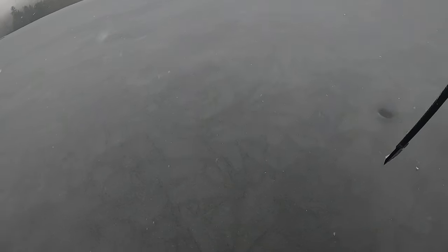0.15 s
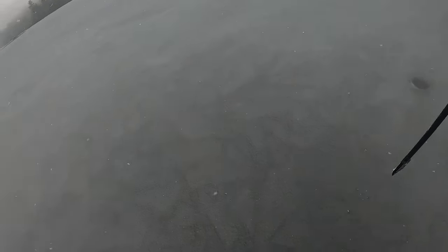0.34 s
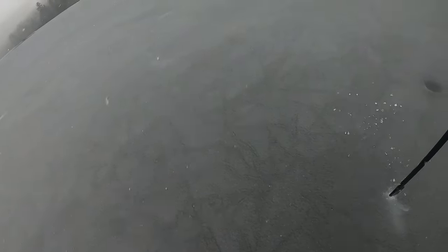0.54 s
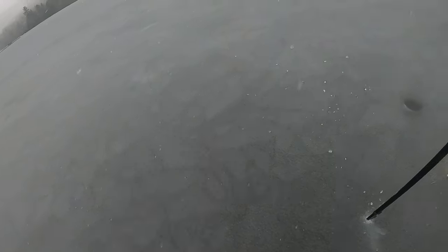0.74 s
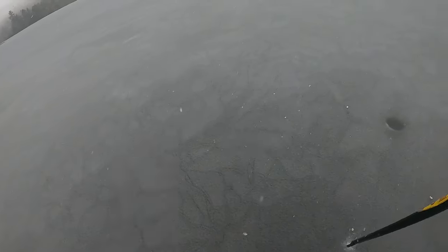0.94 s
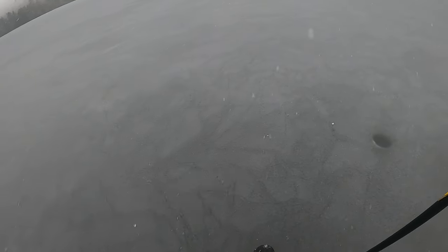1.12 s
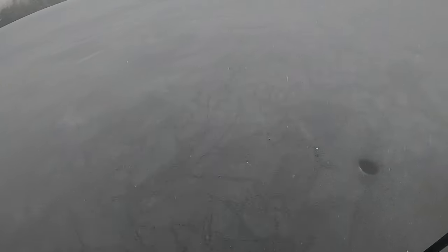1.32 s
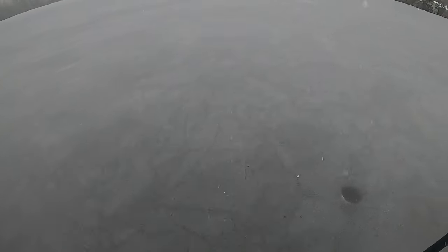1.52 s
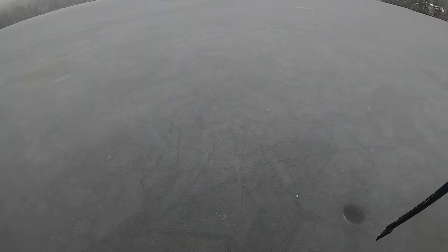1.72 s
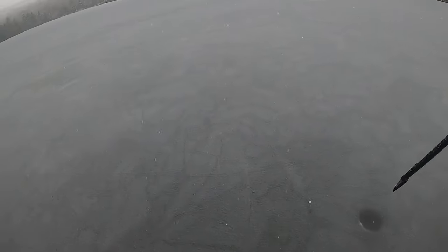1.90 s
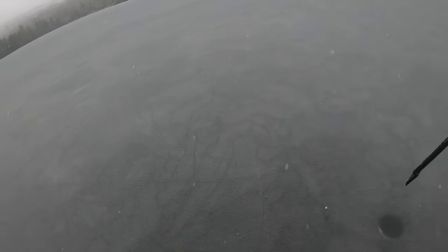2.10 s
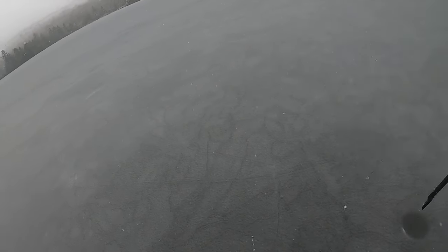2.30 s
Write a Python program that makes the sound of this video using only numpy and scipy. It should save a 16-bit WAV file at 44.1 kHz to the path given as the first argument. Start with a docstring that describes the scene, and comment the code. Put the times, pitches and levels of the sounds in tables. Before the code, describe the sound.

A steel chisel strikes lake ice once with a sharp crack, then spiked boots crunch and click

```python
"""A steel chisel is driven once into lake ice by someone walking in spiked boots, close to a worn camera.
The blow is dense crackle plus scattering splinters, a falling thump swept through the sheet, and a ring.
Spikes bite as short pings with noise ticks, boots knock as lower pings, and footfalls crunch as fine
crackle. Clothes and soles rustle as three bands of noise; low noise, mostly different at the two
microphone ports, makes the wind gusts and a few deep footstep thumps."""
import sys
import numpy as np
from scipy import signal
from scipy.fft import rfft, irfft
from scipy.io import wavfile
from scipy.ndimage import uniform_filter1d

SR = 44100
rng = np.random.default_rng(int(sys.argv[2]) if len(sys.argv) > 2 else 0)


def dump(signal):
    """Clip the signal to [-1, 1] and save it as 16-bit WAV at the path in sys.argv[1]."""
    limited = np.clip(np.atleast_2d(signal).T, -1, 1)
    pcm = np.round(limited * 32767).astype(np.int16)
    wavfile.write(sys.argv[1], SR, pcm)


N = 103635  # samples

# Chisel blow: the crack holds, then fades
BLOW_S, CRACK_S, CRACK_FADE_S, CRACK_DB, CRACKS_PER_S = 0.5203, 0.0073, 0.0041, -23, 22000
IMPACT_DB, IMPACT_S = 6.5, 0.0028  # extra strength as the edge first lands
SPLIT_LAG_S, SPLIT_DB, SPLIT_S = 0.0079, 4, 0.0011  # the ice gives way a moment later
CRACK_LAG_S = 0.001405  # delay at 1 kHz; the low part trails the treble
CHIP_T60_S, CHIP_DB = 0.16, -38.5  # splinters scatter after the blow
SHEET_DB, SHEET_LAG_S, SHEET_SLOPE = -11, 0.0089, 0.271  # peak; delay at 1 kHz; lows come later
RING_DB, RING_LAG_S, RING_RISE_S = -25.5, 0.01303, 0.0023
# Colour of splitting ice: freq_hz, level_db
CRACK_COLOUR = [(300, -34), (600, -18), (900, -4.5), (1600, -2.5), (2050, -9.5), (2600, -5), (3300, -5),
                (4400, -8.5), (5300, -12.5), (8000, -13), (11500, -29), (15500, -39)]
# Colour of the bending wave in the ice sheet: freq_hz, level_db
SHEET_COLOUR = [(15, -20), (30, 1), (90, -2), (300, -9), (600, -19.5), (1100, -16), (1600, -63),
                (3000, -90)]
# Brief ringing modes of the sheet: pitch_hz, level_db, t60_s
RING_MODES = [(174, 5.5, 0.11), (282, 1.5, 0.081), (410, 1.5, 0.098), (557, -4.5, 0.075), (724, -1, 0.029),
              (816, -1, 0.088), (1090, -4, 0.056)]

# Spike points biting the ice: peak_s, level_db, pitch_hz, length_cycles, tick_level_db
SPIKE_BITES = [(0.1406, -29, 2600, 1.1, -51), (0.2085, -27, 1530, 2.9, -27.5),
               (0.2131, -20.5, 1520, 1.6, -40), (0.2153, -21.5, 4100, 3.5, -28),
               (0.2188, -15.5, 1650, 1.8, -37), (0.2206, -18, 2660, 4, -26.5),
               (0.2219, -20, 1500, 3.6, -39), (0.2567, -40, 3770, 2, -54), (0.4263, -38, 1070, 1.5, -55),
               (0.7234, -33, 1760.0, 1.2, -58), (1.0553, -20.5, 2940, 2.2, -56),
               (1.0594, -30.0, 2020.0, 3.8, -55), (1.064, -31, 3120, 2, -52),
               (1.0657, -29.0, 2150, 4.3, -49.0), (1.069, -25, 2310, 4.8, -52),
               (1.0739, -23, 1630, 5.9, -48), (1.076, -20, 2010, 9.4, -53), (1.0793, -17, 1970, 2.1, -48),
               (1.0846, -20, 2200, 1.3, -42), (1.087, -18, 1300, 1.3, -42), (1.0891, -16.5, 3020, 3.9, -38),
               (1.0914, -18, 2860, 5.6, -26), (1.095, -27, 3500, 3.9, -55), (1.1006, -31, 3900, 4, -49),
               (1.104, -35, 3600, 2.2, -50), (1.2786, -22, 1430, 0.5, -34), (1.3045, -29, 3520, 3.2, -36),
               (1.355, -29, 1700.0, 2.8, -46), (1.3603, -18.5, 1920, 1.8, -50),
               (1.3643, -9.5, 2050, 1.7, -25.5), (1.365, -22.5, 2860, 3.4, -46),
               (1.3682, -19.5, 2850, 3.5, -49), (1.3697, -22, 1390, 6.4, -51), (1.378, -31, 2200, 3.4, -50),
               (1.3833, -31, 1990, 2.5, -55), (1.4047, -32, 1690, 1.6, -61), (1.442, -42, 8950, 3.7, -63),
               (1.785, -27, 4300, 8.6, -32), (1.796, -28, 1630, 2.5, -30), (1.8032, -30, 2940.0, 4, -50.0),
               (1.8084, -31, 3050, 3.8, -44), (1.8236, -27.5, 2590.0, 3.6, -48.0),
               (1.837, -24, 2490.0, 1.1, -43), (1.847, -27, 2580, 6.3, -51), (1.853, -38, 2620, 6.3, -52.0),
               (1.8627, -19, 2700, 1.3, -25), (1.8647, -23, 1300, 1.6, -39), (1.8693, -27.5, 1140, 2, -51),
               (1.872, -28, 1760, 2.8, -48), (1.874, -33, 2580, 6, -53), (1.889, -28, 3500, 6, -50),
               (1.902, -26, 5300, 6.6, -31), (1.9084, -31, 1440.0, 1.5, -30),
               (1.917, -33.5, 1320.0, 6, -51.0), (2.0524, -33, 4920, 6.2, -48),
               (2.057, -24.5, 1570, 5.2, -28), (2.0614, -19.5, 2900, 2, -21), (2.063, -16, 1694, 2.56, -21),
               (2.0655, -23.5, 7700, 10, -21), (2.069, -40, 2880, 3, -51), (2.0743, -33, 3620, 8, -50.0),
               (2.118, -39, 2750, 2, -58), (2.29, -50, 4840, 2.7, -56), (2.301, -49, 3260, 2.6, -48),
               (2.321, -48, 3120, 3, -60)]
# Colour of the dry tick at each bite: freq_hz, level_db
TICK_COLOUR = [(1200, -34), (2500, -6), (3900, 2.5), (4900, -3), (5900, 3.5), (8500, -5.5), (12000, -33),
               (15500, -41)]
TICK_FADE_S = 0.0009
# Boot knocks carried by the ice: peak_s, level_db, pitch_hz, length_cycles
BOOT_KNOCKS = [(0.03, -41.5, 285, 3.1), (0.218, -37.5, 350, 2.4), (0.425, -32.5, 314, 1.74),
               (1.0908, -30.5, 244, 0.53), (1.0988, -26.5, 213, 1.2), (1.1119, -32, 222, 2.5),
               (1.1378, -41, 212, 7.3), (1.1466, -28, 230.0, 1), (1.1926, -35.5, 230, 1.6),
               (1.2307, -35.5, 180, 1.9), (1.2825, -21, 229, 0.86), (1.2913, -34.5, 216, 2),
               (1.3714, -32, 219, 1.23), (1.6186, -36, 336, 2), (1.65, -38, 543, 3.4),
               (1.6755, -39, 333, 2.3), (1.7081, -30.5, 343, 0.46), (1.8579, -23, 310, 1.2),
               (1.8743, -28, 213, 3.4), (1.9024, -28.5, 162, 2.3), (1.9108, -30, 177, 0.41),
               (1.9379, -31.5, 202, 0.74), (1.972, -36.5, 253, 2.4), (2.0664, -30, 254, 1.44)]
# Second partial of a bite or knock: lowest pitch ratio, range of ratios, level below the first
OVERTONE_RATIO, OVERTONE_SPREAD, OVERTONE_DB = 1.37725, 0.875, -9

# Crunch under the footfalls: start_s, length_s, level_db
FOOTFALLS = [(0.21, 0.0081, -36.5), (0.7196, 0.0045, -49), (1.061, 0.033, -44), (1.088, .014, -39.5),
             (1.353, 0.02, -42), (1.778, 0.09, -46.5), (1.854, 0.058, -43.5), (2.055, 0.01, -34),
             (2.07, 0.0086, -45.5), (2.192, 0.006, -68)]
# Colour of the crunch: freq_hz, level_db
CRUNCH_COLOUR = [(290, -22), (500, -6.5), (815, -10), (1650, -0.5), (2460, -4.5), (3060, -2.5), (4600, -7),
                 (5800, -13.5), (7030, -11), (7780, -16.5), (15500, -44)]
CRUNCH_PER_S, CRUNCH_T60_S, CRUNCH_RISE_S = 12000, 0.04, 0.00077

# Clothes and sliding soles: time_s, middle_db, low_db, treble_db
RUSTLE_LEVELS = [(0, -44, -40, -54), (0.04, -46.5, -48, -57.5), (0.08, -53.5, -50.5, -59),
                 (0.13, -48, -49, -55), (0.18, -49.5, -49.5, -57), (0.25, -49, -51.5, -57.5),
                 (0.33, -48, -49.5, -59), (0.39, -55, -53.5, -64.5), (0.46, -51, -46.5, -62.5),
                 (0.51, -46.5, -45.5, -50.5), (0.56, -61, -39, -63), (0.595, -50, -43, -59),
                 (0.63, -54, -54, -62.5), (0.69, -58, -50.5, -66), (0.76, -54, -54, -65),
                 (0.82, -50.5, -50, -58), (0.9, -49.5, -49.5, -61), (0.965, -48.5, -49, -58.5),
                 (1.035, -46, -50, -54.5), (1.08, -39.5, -53, -54), (1.13, -40.5, -42.5, -55.5),
                 (1.2, -44.5, -47.5, -56.5), (1.26, -42, -52, -50), (1.33, -41.5, -49, -48),
                 (1.36, -42.5, -54, -54), (1.39, -46.5, -50.5, -57.5), (1.43, -55.5, -55, -62.5),
                 (1.5, -51.5, -54.5, -61), (1.56, -50.5, -47, -57), (1.62, -46, -49, -56),
                 (1.7, -49, -49, -59.5), (1.75, -53.5, -55.5, -66), (1.79, -51, -49.5, -47.5),
                 (1.86, -41, -42, -56), (1.94, -48.5, -42, -53.5), (2.0, -53, -56.5, -59),
                 (2.04, -54, -49, -57.5), (2.1, -47.5, -50, -55.5), (2.15, -56.5, -60, -61.5),
                 (2.22, -56, -59, -61), (2.28, -62, -62.5, -70), (2.35, -56.5, -60, -65)]
# Colours of the three rustle bands: freq_hz, level_db
RUSTLE_MIDDLE = [(350, -7.5), (600, -4), (882, -14.5), (1030, -1), (1710, -1.5), (2220, -3), (4120, -6.5),
                 (6000, -23), (7800, -50), (13200, -120)]
RUSTLE_LOW = [(65, -63), (110, -30), (166, -1.5), (236, -4), (284, -3), (536, -13), (900, -19.5),
              (1170, -29), (1980, -120)]
RUSTLE_TREBLE = [(2650, -35), (4500, -3), (4860, -4.5), (5900, -7.5), (8220, -7), (9660, -18.5),
                 (12500, -19.5), (15600, -40)]
# Likeness of the rustle at the two ports: freq_hz, likeness (0 to 1)
RUSTLE_LIKENESS = [(60, 0.23), (150, 0.7), (380, 0.92), (950, 0.68), (2380, 0.8), (5980, 0.11),
                   (15000, 0.02)]

# Low noise at the ports: wind gusts, and deep footstep thumps near 1.11, 1.285, 1.87 and 2.07 s:
# time_s, left_db, right_db
LOW_NOISE_LEVELS = [(0, -42, -53), (0.04, -39, -38), (0.08, -56, -60), (0.13, -46, -62), (0.16, -37, -51),
                    (0.2, -36, -49), (0.23, -27.5, -36), (0.27, -40, -57), (0.3, -33, -40),
                    (0.335, -22.5, -39), (0.37, -34.5, -41), (0.4, -34, -42), (0.44, -34, -44),
                    (0.48, -27.5, -44), (0.51, -32, -56), (0.57, -37, -30.5), (0.605, -36, -24.5),
                    (0.65, -42, -32), (0.69, -24, -28.5), (0.73, -30.5, -38), (0.78, -46, -38),
                    (0.81, -38.5, -43), (0.84, -36.5, -48), (0.88, -55, -69), (0.92, -68, -67),
                    (1.0, -54, -64), (1.06, -67, -60), (1.11, -36, -36.5), (1.15, -71, -73),
                    (1.25, -61, -67), (1.285, -32.5, -32.5), (1.33, -56, -61), (1.38, -60, -57),
                    (1.42, -51, -63), (1.48, -53, -57), (1.56, -61, -73), (1.8, -77, -64), (1.87, -53, -59),
                    (1.94, -56, -54), (2.0, -71, -73), (2.07, -47.5, -60), (2.13, -59.5, -60),
                    (2.35, -77, -83)]
# Colour of the gusts and thumps: freq_hz, level_db
LOW_NOISE_COLOUR = [(8.8, -55), (15, 2), (38, 0), (58, 0.5), (139, -9.5), (254, -29), (292, -53),
                    (400, -37), (520, -74), (880, -120)]
LOW_NOISE_LIKENESS = 0.56  # left to right, 0 to 1

# Phase between the ports: freq_hz, left_lead_radians
PORT_PHASE = [(30, 0), (340, -.3), (1700, -.6), (3100, -.85), (5000, -1.5), (6000, -2.8), (8000, -3.4),
              (10500, -5.4)]
# Level between the ports: freq_hz, left_minus_right_db
PORT_TILT = [(60, 4), (180, 0.5), (550, 0), (1650, 1.5), (3100, 2.5), (15000, -2)]
# Random smear of near sounds, opposite at the ports: freq_hz, level_db
SMEAR_COLOUR = [(500, -18), (1400, -17), (4000, -10), (6000, -8), (14000, -4)]
EDGE_HZ = 15750  # upper band limit of the camera


def amp(db):
    """Decibels to amplitude."""
    return 10 ** (np.asarray(db) / 20)


def evened(x):
    """Scales to unit RMS."""
    return x / np.sqrt(np.mean(x ** 2) + 1e-20)


def read(points, hz):
    """Reads a frequency table on a logarithmic frequency axis."""
    f, value = np.transpose(points)
    return np.interp(np.log(hz + 1), np.log(f + 1), value)


def curve(table, col):
    """Draws one column of a time table as a line over the whole scene."""
    rows = np.array(table)
    return np.interp(np.arange(N) / SR, rows[:, 0], rows[:, col])


def add(mix, s, sound):
    """Lays a sound into the mix from s seconds."""
    part = mix[round(s * SR):][:len(sound)]
    part += sound[:len(part)]


def delayed(spectrum, lag_s, hz):
    """Delays each frequency by its own lag, by summing the lag into phase."""
    return spectrum * np.exp(-2j * np.pi * np.cumsum(lag_s) * hz[1])


def colour(x, spectrum):
    """Filters by a spectrum table, scaled so that white noise keeps its power."""
    gain = amp(read(spectrum, np.fft.rfftfreq(len(x), 1 / SR)))
    return irfft(rfft(x) * evened(gain), len(x))


def crackle(per_s, spread_db, cycles):
    """Random grains of uneven size, each a few cycles at its own pitch; high ones come most often."""
    pitch_hz = np.geomspace(500, 14000, num=24)
    size = amp(spread_db * np.minimum(rng.exponential(1, N), 3)) * rng.standard_normal(N)
    size *= rng.random(N) < per_s / SR
    kind = rng.choice(24, N, p=pitch_hz / pitch_hz.sum())
    out = np.zeros(N)
    for k, hz in enumerate(pitch_hz):
        turns = np.arange(0, 3 * cycles / hz, 1 / SR) * hz
        envelope = np.sin(np.pi * turns / cycles / 3) * np.exp(-turns / cycles)
        grain = envelope * np.cos(2 * np.pi * turns)
        out += signal.oaconvolve(size * (kind == k), grain / np.linalg.norm(grain))[:N]
    return evened(out)


def hiss(spectrum, same, patchy_db, flicker_db, size):
    """Two-channel noise with drifting patches and a flicker shared by all frequencies."""
    frames, hz = 4 * N // size + 5, np.fft.rfftfreq(size, 1 / SR)
    a, b, c, d, patches = rng.standard_normal((frames, len(hz), 5)).T
    patches = uniform_filter1d(patches, size=8, axis=0)
    patches = evened(uniform_filter1d(patches, size=8, axis=1))
    flicker = evened(uniform_filter1d(rng.standard_normal(frames), size=3))
    alike = np.clip(read(same, hz), 0, 1)[:, None]
    left = a + 1j * b
    right = alike * left + np.sqrt(1 - alike ** 2) * (c + 1j * d)
    level_db = read(spectrum, hz)[:, None] + patchy_db * patches + flicker_db * flicker
    bins = np.array([left, right]) * amp(level_db)
    return evened(signal.istft(bins, nperseg=size, noverlap=3 * size // 4)[1][:, :N])


def pings(table):
    """Each row is a few cycles that swell fast and die, with a weaker second partial."""
    out, draws = np.zeros(N), rng.random((len(table), 2))
    for (s, db, hz, cycles, *_), (turn, bend) in zip(table, draws):
        width = max(cycles, 0.5) / hz
        t = np.arange(-width, 2.2 * width, 1 / SR)
        rise = (t / (0.45 * width)) ** 2
        fall = (abs(t) / (0.62 * width)) ** 1.26
        shape = np.exp(-np.where(t < 0, rise, fall))
        turns = hz * t * (1 + 0.2 * (bend - 0.5) * t / width)  # pitch bends slightly
        ratio = OVERTONE_RATIO + OVERTONE_SPREAD * turn
        upper_level = amp(OVERTONE_DB - 2 * (hz / 2000) ** 2)  # weaker on high pings
        upper = upper_level * shape * np.cos(2 * np.pi * (ratio * turns + bend))
        add(out, s - width, amp(db) * shape * (np.cos(2 * np.pi * (turns + turn)) + upper))
    return out


def crack():
    """Splitting ice and scattering splinters: dense crackle whose low part trails its treble."""
    t = np.arange(N) / SR - BLOW_S
    impact_db = IMPACT_DB * np.exp(-abs(t) / IMPACT_S)
    split_db = SPLIT_DB * np.exp(-((t - SPLIT_LAG_S) / SPLIT_S) ** 2)
    fade = np.exp(-np.maximum(t - CRACK_S, 0) / CRACK_FADE_S)
    split = amp(CRACK_DB + impact_db + split_db) * fade
    chips = amp(CHIP_DB - 60 * abs(t) / CHIP_T60_S)
    grains = colour(crackle(CRACKS_PER_S, spread_db=2.5, cycles=1.36), CRACK_COLOUR)
    out = grains * (split + chips) * np.clip(t / 0.0004, 0, 1)
    hz = np.fft.rfftfreq(N, 1 / SR)
    return irfft(delayed(rfft(out), CRACK_LAG_S * 1000 / np.maximum(hz, 500), hz), N)


def sheet_wave():
    """The bending wave in the ice sheet: an impulse whose lows arrive last, a falling thump."""
    hz = np.fft.rfftfreq(8192, 1 / SR)
    lag_s = SHEET_LAG_S * (np.maximum(hz, 20) / 1000) ** -SHEET_SLOPE
    wave = irfft(delayed(amp(read(SHEET_COLOUR, hz)), lag_s, hz)) * signal.windows.tukey(8192, 0.02)
    return -amp(SHEET_DB) * wave / abs(wave).max()


def sheet_ring():
    """The sheet rings briefly: decaying sines that start at random phases."""
    t = np.arange(8192) / SR
    ring = np.zeros(8192)
    for hz, db, t60_s in RING_MODES:
        ring += amp(db - 60 * t / t60_s) * np.sin(2 * np.pi * (hz * t + rng.random()))
    return amp(RING_DB) * np.minimum(t / RING_RISE_S, 1) * ring


def blow():
    """The chisel lands: the crack, the wave in the sheet, then the ring."""
    out = crack()
    add(out, BLOW_S, sheet_wave())
    add(out, BLOW_S + RING_LAG_S, sheet_ring())
    return out


def bites():
    """Spike points bite the ice as short pings."""
    return pings(SPIKE_BITES)


def ticks():
    """The bright, dry tick of steel on ice at each bite: a fading puff of noise."""
    out = np.zeros(N)
    fade = np.exp(-np.arange(200) / SR / TICK_FADE_S)
    for row, puff in zip(SPIKE_BITES, rng.standard_normal((len(SPIKE_BITES), 200))):
        add(out, row[0] - TICK_FADE_S / 2, amp(row[4]) * puff * fade)
    return colour(out, TICK_COLOUR)


def knocks():
    """Boots knock through the ice as low pings."""
    return pings(BOOT_KNOCKS)


def crunch():
    """Fine crackle under each footfall: holds, then dies away."""
    t, level = np.arange(N) / SR, np.zeros(N)
    for s, length, db in FOOTFALLS:
        fall_db = 60 * np.maximum(t - s - length, 0) / CRUNCH_T60_S
        level += amp(db - fall_db) * np.clip((t - s) / CRUNCH_RISE_S, 0, 1)
    return level * colour(crackle(CRUNCH_PER_S, spread_db=0.5, cycles=1.93), CRUNCH_COLOUR)


def rustle():
    """Clothes and sliding soles: three bands of rubbing noise, each on its own level."""
    middle = hiss(RUSTLE_MIDDLE, RUSTLE_LIKENESS, patchy_db=2.0, flicker_db=1.5, size=256)
    low = hiss(RUSTLE_LOW, RUSTLE_LIKENESS, patchy_db=1.0, flicker_db=1.5, size=1024)
    treble = hiss(RUSTLE_TREBLE, RUSTLE_LIKENESS, patchy_db=-0.9, flicker_db=1.4, size=256)
    out = amp(curve(RUSTLE_LEVELS, 1)) * middle
    out += amp(curve(RUSTLE_LEVELS, 2)) * low
    return out + amp(curve(RUSTLE_LEVELS, 3)) * treble


def gusts_and_thumps():
    """Wind gusts and deep footstep thumps: lumpy low noise with its own level at each port."""
    likeness = [(0, LOW_NOISE_LIKENESS), (400, LOW_NOISE_LIKENESS)]
    lumps = hiss(LOW_NOISE_COLOUR, likeness, patchy_db=1.0, flicker_db=-0.1, size=2048)
    return amp(np.array([curve(LOW_NOISE_LEVELS, 1), curve(LOW_NOISE_LEVELS, 2)])) * lumps


def near(x):
    """A close sound gains a short random smear of opposite sign at the two ports, which widens it."""
    taps = rng.standard_normal(300) * np.exp(-np.arange(300) / 55) * [[1], [-1]]
    smear = signal.fftconvolve(x[None], taps / np.linalg.norm(taps[0]), axes=1)[:, :N]
    gain = amp(read(SMEAR_COLOUR, np.fft.rfftfreq(N, 1 / SR)))
    return x + irfft(rfft(smear) * gain, N)


def at_ports(x):
    """Sets the phase and level differences between the left and right ports."""
    hz = np.fft.rfftfreq(N, 1 / SR)
    side = np.array([[0.5], [-0.5]])  # half of each difference goes to each port
    phase = np.exp(1j * side * read(PORT_PHASE, hz))
    return irfft(rfft(x) * phase * amp(side * read(PORT_TILT, hz)), N)


def scene():
    """Blow, boots and rustle reach both ports; the low noise is added with its own left and right."""
    on_ice = blow() + bites() + ticks() + knocks() + crunch()
    return at_ports(near(on_ice) + rustle()) + gusts_and_thumps()


def record(dry):
    """The band limit of the camera: a steep low-pass."""
    low_pass = signal.firwin(511, EDGE_HZ, window=("kaiser", 9), fs=SR)
    return signal.oaconvolve(dry, low_pass[None], "same")


dry = scene()
out = record(dry)
dump(out)
```